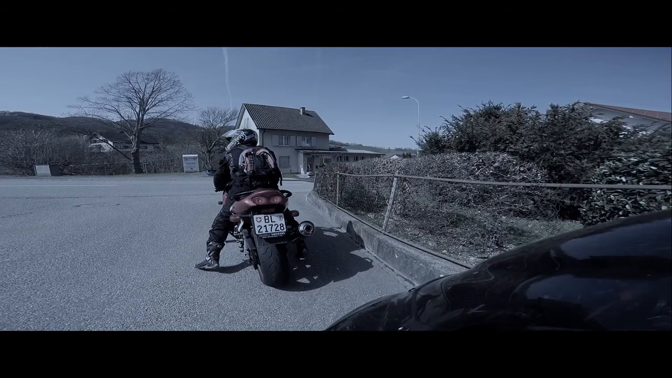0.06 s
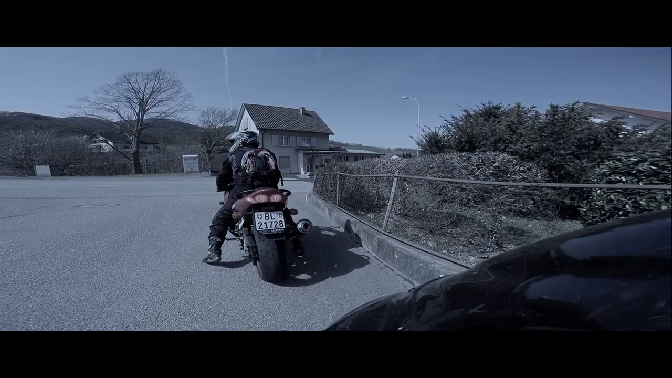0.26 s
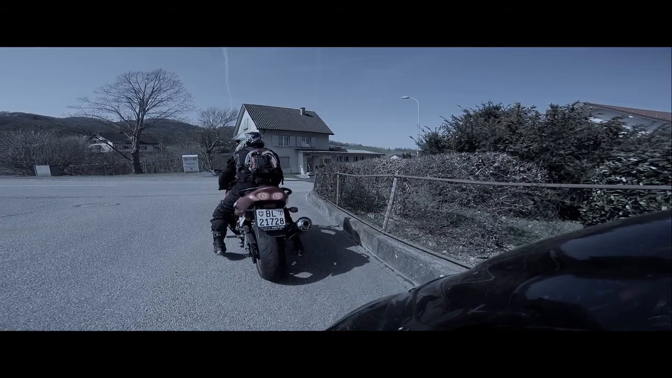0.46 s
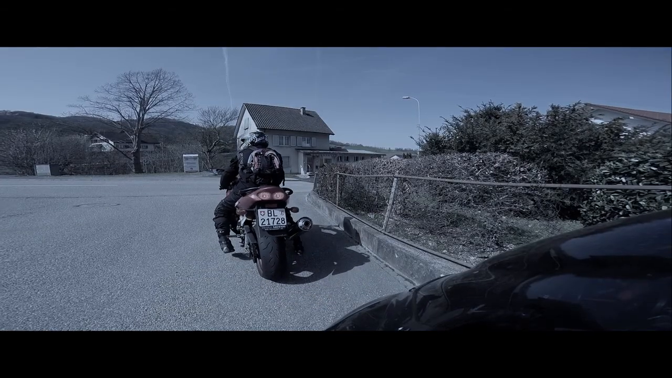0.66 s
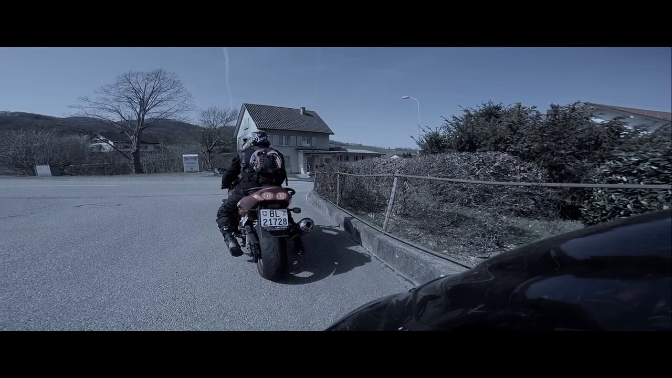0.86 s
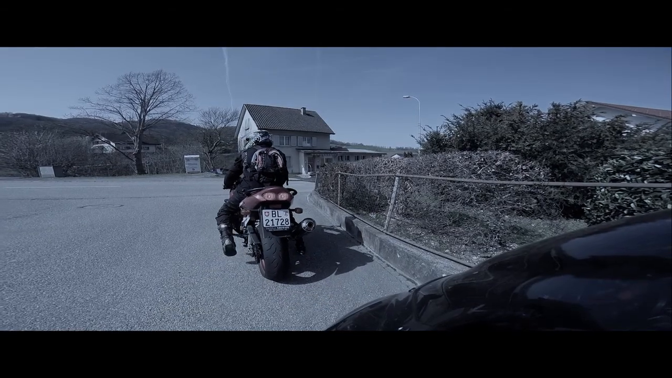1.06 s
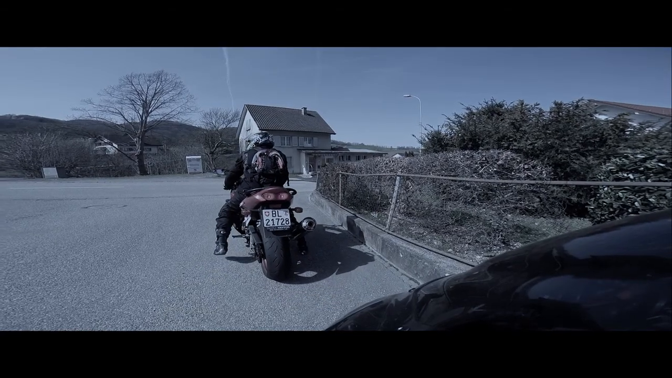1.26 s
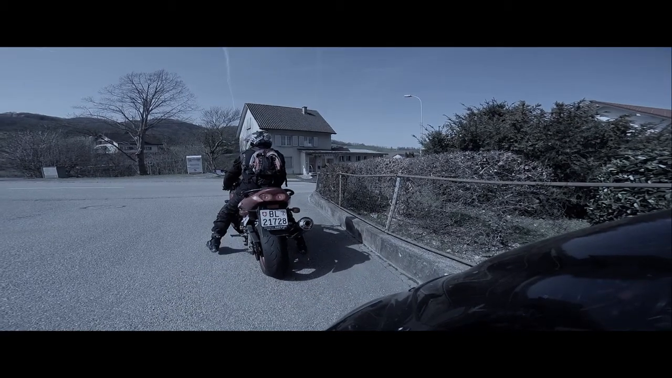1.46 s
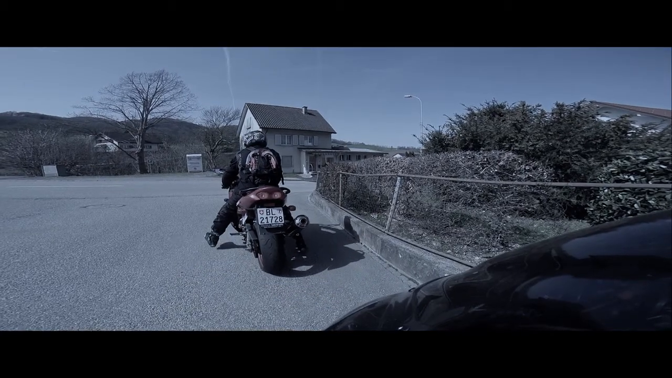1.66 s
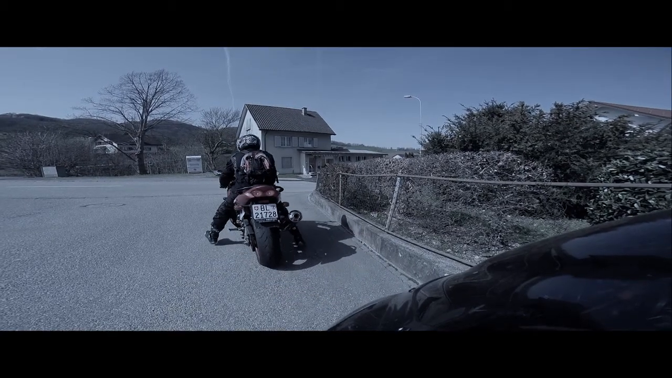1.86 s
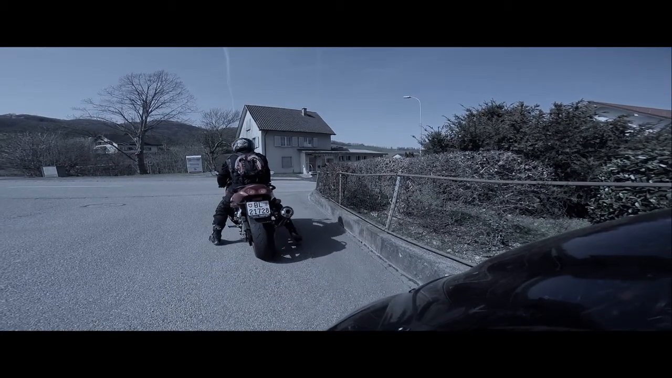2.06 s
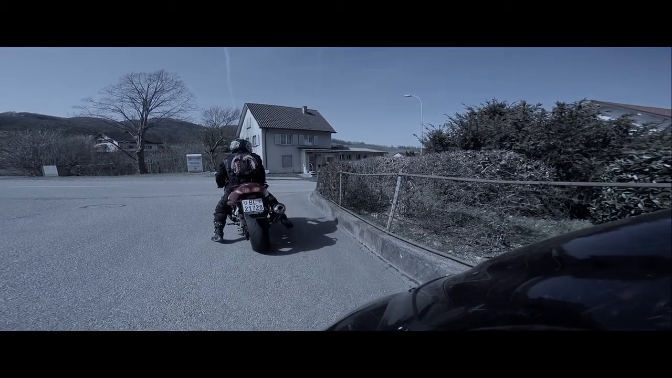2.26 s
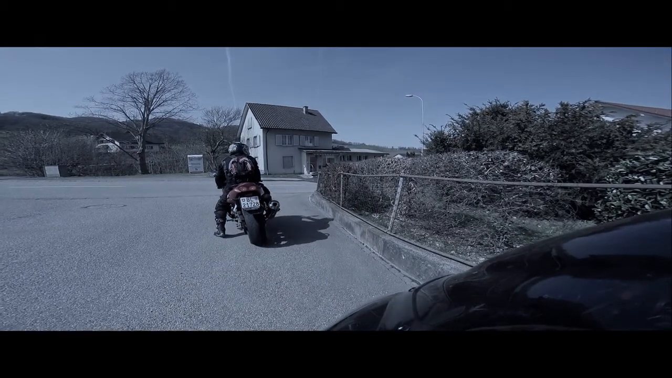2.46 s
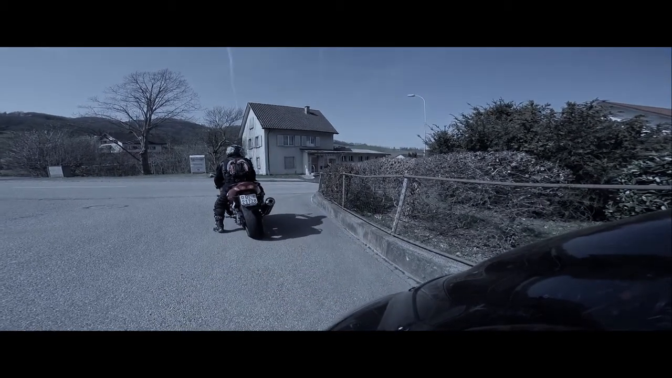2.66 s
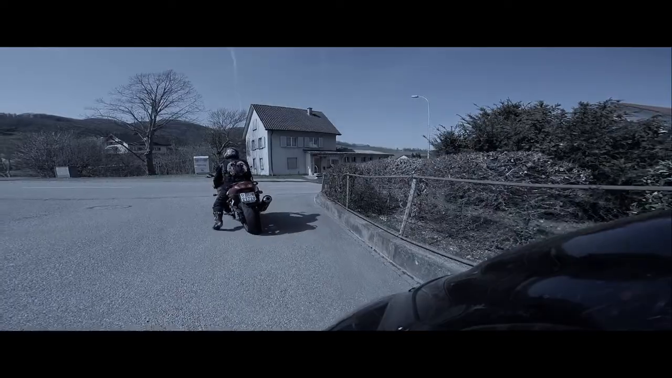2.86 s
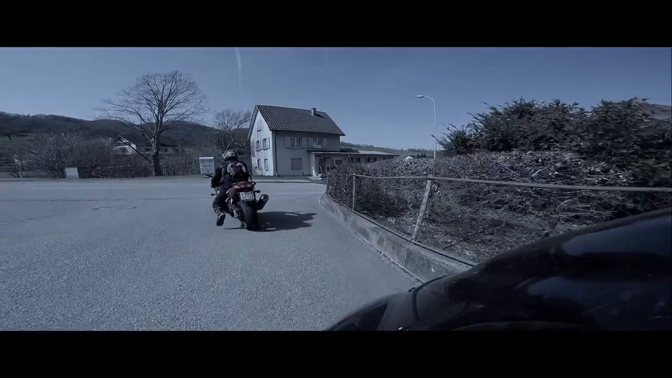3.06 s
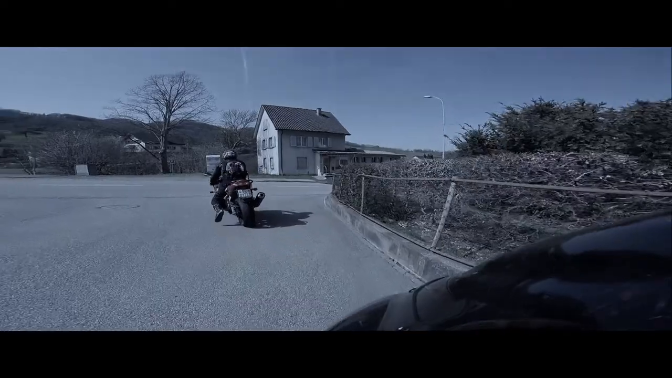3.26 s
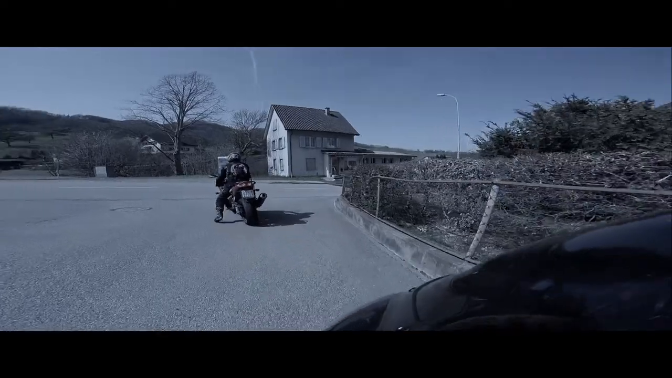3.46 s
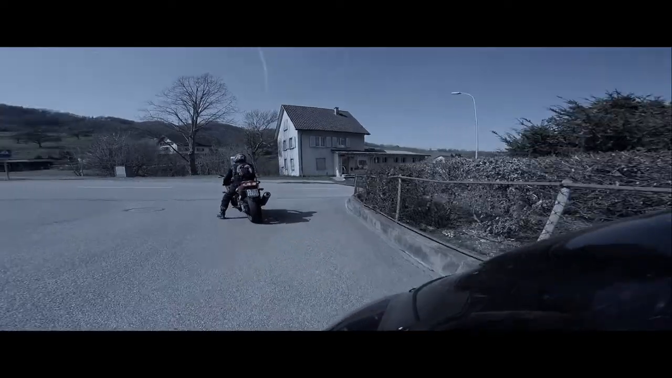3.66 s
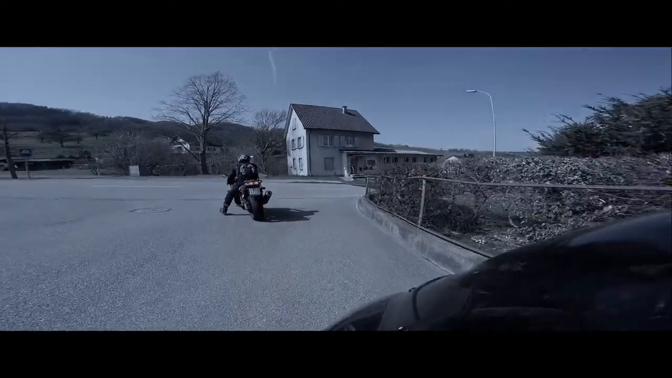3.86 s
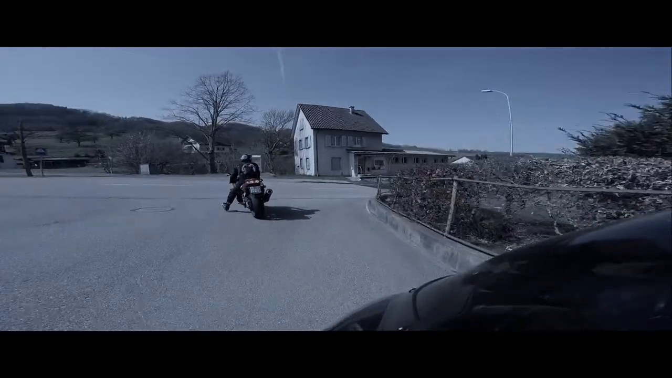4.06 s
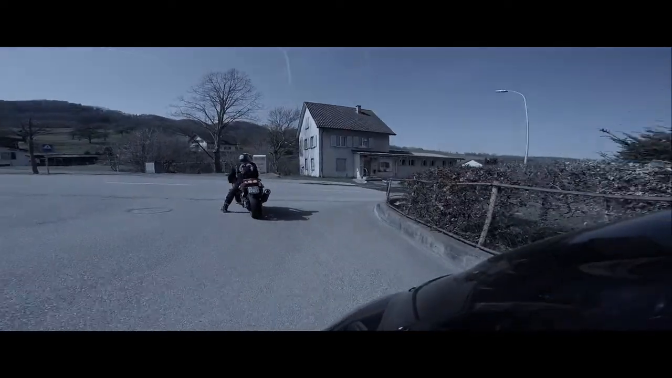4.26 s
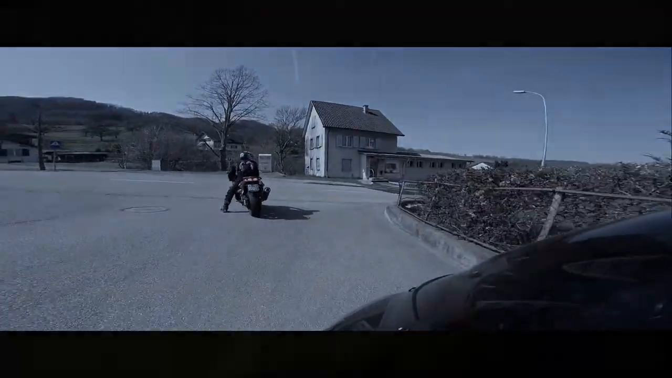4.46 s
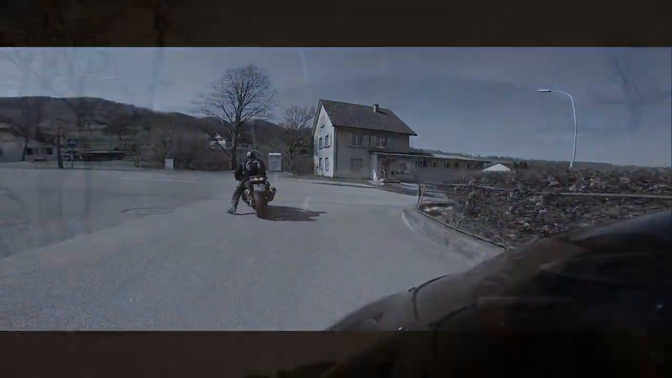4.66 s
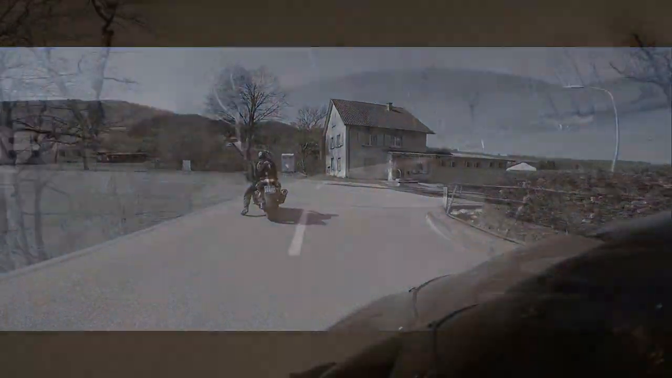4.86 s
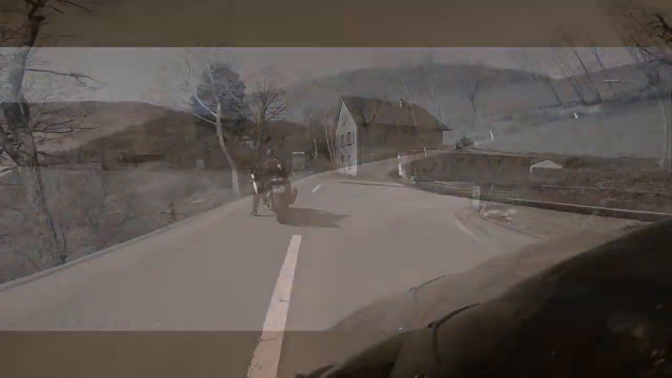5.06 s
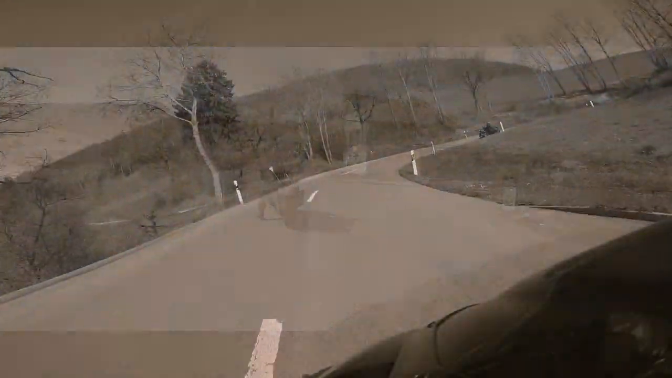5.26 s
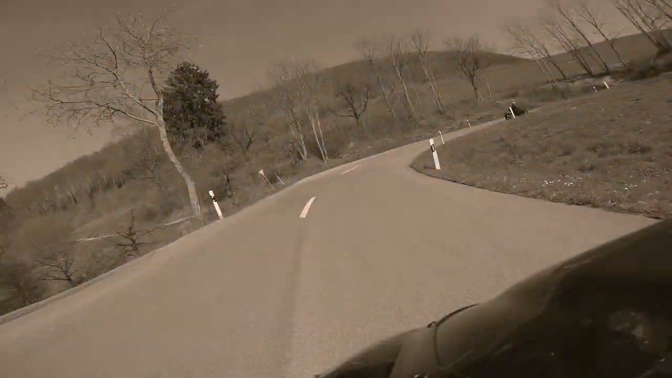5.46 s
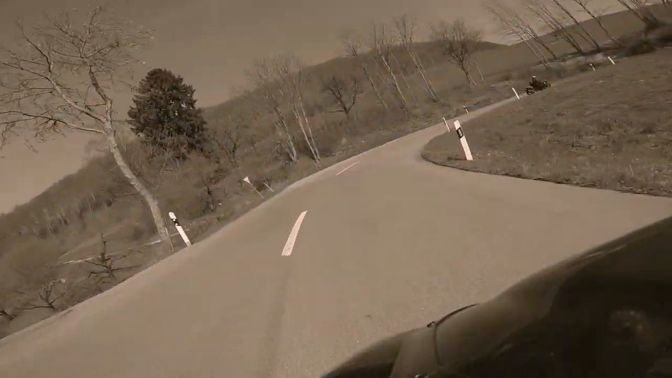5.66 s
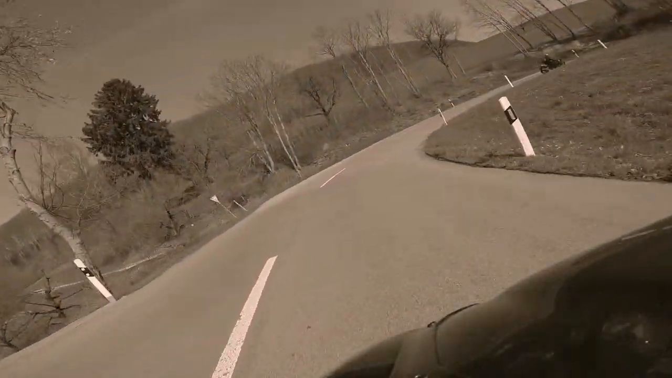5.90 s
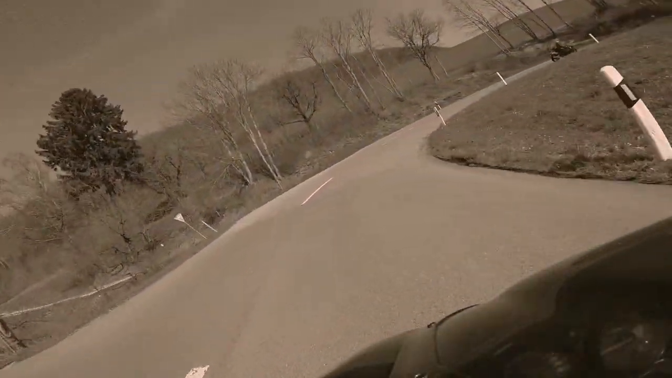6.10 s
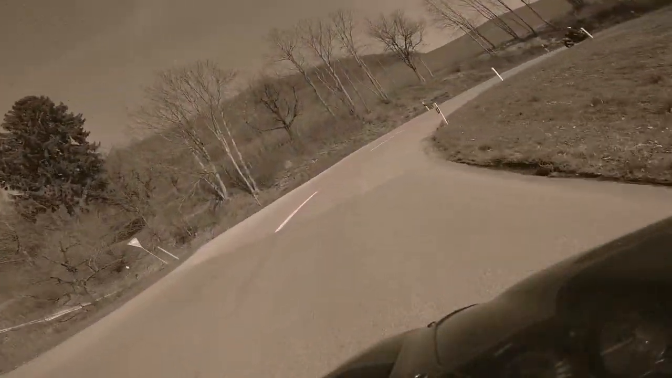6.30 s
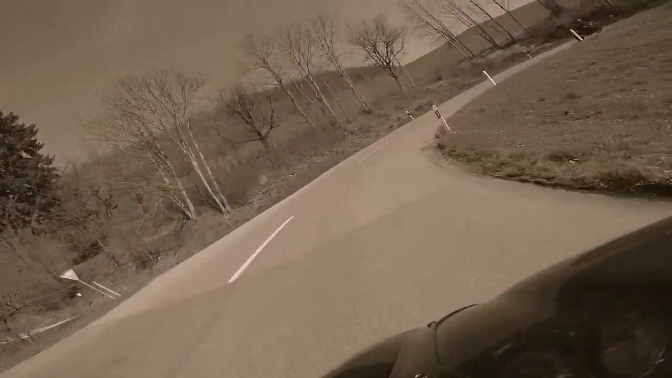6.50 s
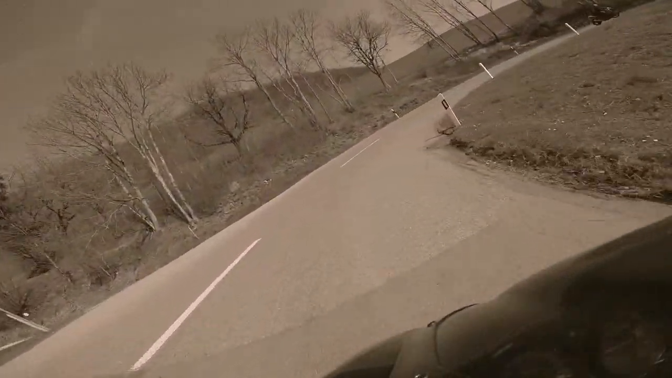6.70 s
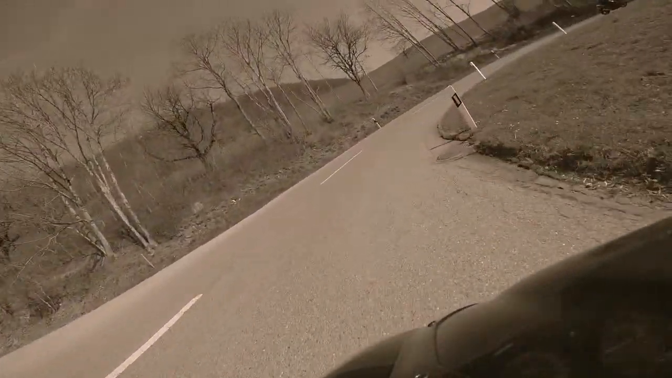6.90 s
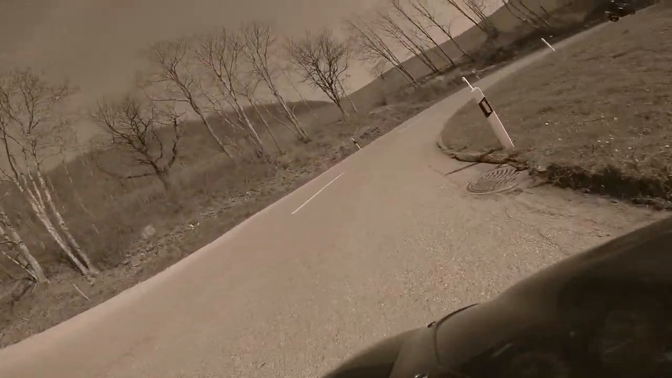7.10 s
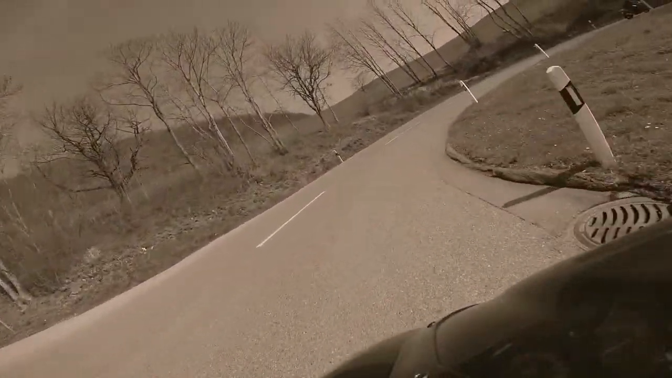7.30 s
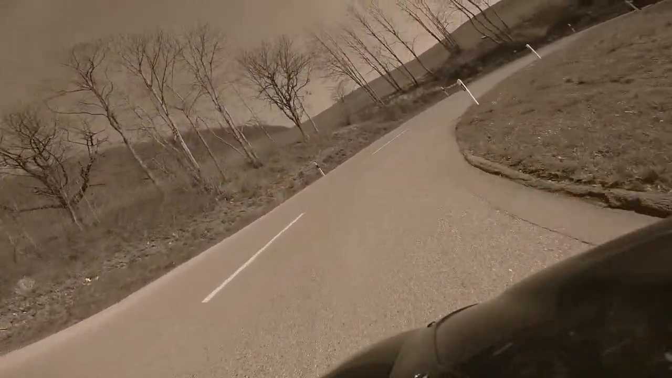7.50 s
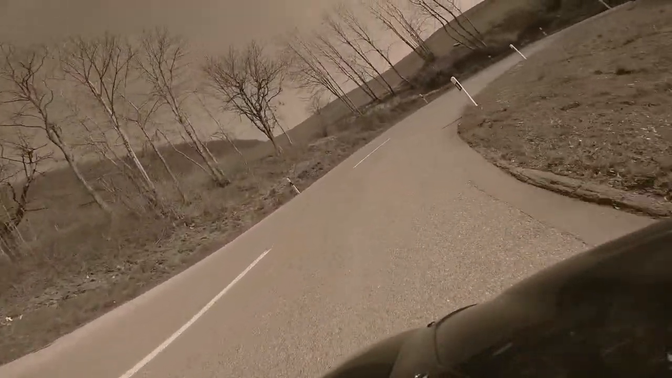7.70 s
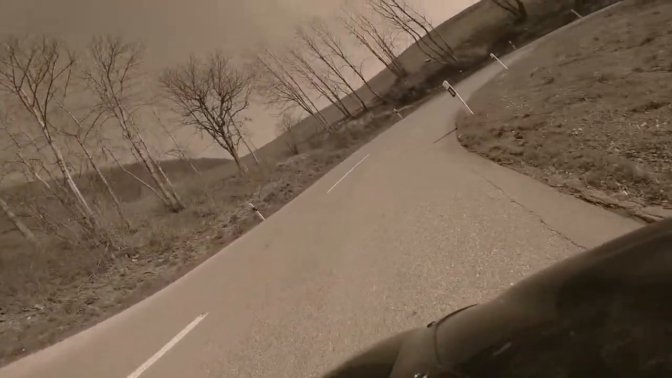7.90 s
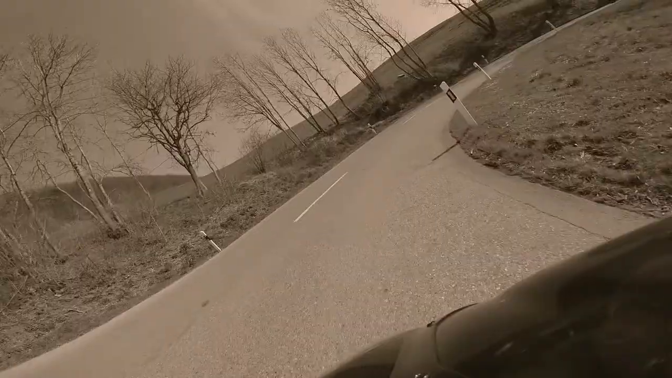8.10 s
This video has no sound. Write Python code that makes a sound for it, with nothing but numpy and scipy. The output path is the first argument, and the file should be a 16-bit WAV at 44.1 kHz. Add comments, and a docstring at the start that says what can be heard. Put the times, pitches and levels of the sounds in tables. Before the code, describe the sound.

A motorcycle's starter whines and grinds for a moment before the engine fires, surges and gradually settles into a boomy idle. Thin ticks dot the muffled valve clatter. Clutch take-up brings a dip, throbs and dull knocks. The sound crossfades to faster riding with a fleeting airy whistle, soft tyre hum and deep wind rumble; revs sink, linger, then rise. The microphone sits close, boxed in on the bike.

```python
"""A four-cylinder motorcycle, heard from inside a closed case on the bike. The starter grinds in bursts (noise
and a whine), then the engine catches, flares, settles and pulls away at idle speed. The scene dissolves into a
ride: the revs sink, hold and rise in a bend. Sine waves at the firing rate make the boom and its overtones;
pulsing noise and valve taps shake the case, which rings near 1.8 kHz. Short impulses make knocks and thin sharp
ticks. Wind rumbles throughout; on the ride, filtered noise makes the tyres sing, and air whistles briefly."""
import sys
import numpy as np
from scipy import signal
from scipy.fft import rfft, irfft, next_fast_len
from scipy.io import wavfile
from scipy.ndimage import uniform_filter1d, minimum_filter1d, map_coordinates

SR = 44100
rng = np.random.default_rng(int(sys.argv[2]) if len(sys.argv) > 2 else 0)


def wav_out(sig):
    """Save sig, one row per channel (or a flat mono array), as 16-bit PCM at SR to the path in sys.argv[1]."""
    wavfile.write(sys.argv[1], SR, np.round(np.clip(np.atleast_2d(sig).T, -1, 1) * 32767).astype(np.int16))


N = 358974
T = np.arange(N) / SR  # time of every sample, s

# how the closed case colours a shake: pitch_hz [Hz], level_db [relative dB]
CASE_COLOUR = [(330, -50), (560, -32.5), (651, -37.5), (719, -19), (807, -22), (892, -17.5), (986, -19),
               (1170, -30), (1270, -24.5), (1490, -6.5), (1760, 4), (2060, -3), (2760, -32.5), (2950, -38),
               (3100, -36.5), (4030, -59.5), (6820, -120)]
# the faint treble that gets through the case: pitch_hz [Hz], level_db [relative dB]
SIZZLE_COLOUR = [(2500, -10), (3800, 9), (5000, 3.5), (5900, -1), (6500, -0.5), (7200, -9), (10000, -14),
                 (15000, -33.5)]
# moments when the engine works harder: middle_s [s], half_length_s [s], extra_db [dB of clatter]
EFFORT_SWELLS = [(.4, 0.091, 8.5), (.55, 0.029, 4.5), (.72, 0.13, 1), (2.66, 0.071, 3), (3.2, 0.19, 5),
                 (5.75, 0.19, 2), (8.02, 0.52, 2.5)]
# the dissolve into the ride: start_s, end_s [s]
DISSOLVE_S = (4.606, 5.56)

CATCH_S, CLUTCH_S = 0.367, 3.2  # the engine fires; the bike starts to move
IDLE_HZ = 45  # firing rate from which the octaves of revs are counted
EFFORT_SHARE = 0.78  # how much of the effort reaches the overtones and the rumble


def revs():
    """Firing rates in town and on the road, and the share of the road as one scene dissolves into the other."""
    # idle, dragged down as the clutch bites: time_s [s], firing_hz [Hz]
    idle_revs = [(.36, 37.95), (.45, 45.42), (2.8, 44.86), (2.95, 37.5), (3.2, 36.42), (3.55, 41.96),
                 (3.8, 38.56), (4.05, 43.83), (4.3, 41.13), (4.43, 46.52), (4.7, 44.4)]
    # revs on the road: time_s [s], firing_hz [Hz]
    ride_revs = [(4.8, 107.3), (5.25, 99.82), (5.51, 85.07), (5.9, 61.28), (6.17, 56.96), (6.42, 59.39),
                 (6.9, 56.45), (7.53, 55.64), (7.62, 59.77), (7.82, 91.3), (8.14, 121)]
    # the flare climbs at a steady rate to its top, then sinks by equal octaves back to idle
    top_s, top_hz, rise_hz_per_s, fall_oct_per_s = .6, 193.4, 1090, 1.92
    since_top = T - top_s
    falling_hz = top_hz * 2 ** (-fall_oct_per_s * since_top)
    flare_hz = np.clip(top_hz + rise_hz_per_s * since_top, 0, falling_hz)
    # a smooth way to take the higher of the two rates
    town_hz = (flare_hz ** 8 + curve(idle_revs) ** 8) ** (1 / 8)
    wander = 1 + .008 * walk(9)  # random drift, as a share of the firing rate
    return town_hz * wander, curve(ride_revs) * wander, np.interp(T, DISSOLVE_S, [0, 1])


def engine(town_hz, road_hz, riding, octaves):
    """The firings' boom and overtones, valve clatter and airbox hum, with faint dry ticks on the boom's crests."""
    # overtones; fractions come from unequal cylinders: multiple [of the firing rate], level_db [relative dB]
    flare_overtones = [(.25, -33), (.5, -40.5), (.75, -42.5), (1.25, -49), (1.5, -47.5), (1.75, -45),
                       (2, -40), (2.5, -54.5), (3, -49), (4, -59), (5, -56)]
    idle_overtones = [(.5, -45), (1.5, -46.5), (2, -41), (2.5, -51.5), (3, -47.5), (4, -56.5)]
    ride_overtones = [(.5, -39), (.75, -28), (1.5, -44), (2, -34), (2.5, -45), (3, -35), (4, -48)]
    # the boom surges or stumbles: middle_s [s], half_length_s [s], change_db [dB]
    boom_surges = [(.36, 0.046, -7), (.452, .02, 3), (.487, .02, 1), (2.87, 0.023, -4.5),
                   (2.95, 0.022, 3.5), (3.11, 0.042, -13), (3.26, 0.035, 4), (4.95, 0.18, -2),
                   (5.06, .04, -1.5), (5.2, 0.034, -10)]
    # brighter edge of the clatter in the flare: pitch_hz [Hz], level_db [relative dB]
    rasp_colour = [(1900, -7), (2400, -0.5), (2700, -7), (3300, -14), (3700, -35)]
    # clatter: level at idle on the stand, growth with the revs, extras in gear and on the road
    clatter_idle_db, clatter_db_per_oct, clatter_gear_db, clatter_road_db = -25.5, 4, 0.75, -0.08

    # running totals of firings
    town_turns, road_turns = np.cumsum(town_hz) / SR, np.cumsum(road_hz) / SR
    # controls from 0 to 1
    running = np.interp(T, [CATCH_S - .01, CATCH_S + 0.014], [0, 1])
    revving, pulling = np.clip((np.array([town_hz, road_hz]) - 62) / 25, 0, 1)
    in_gear = np.clip((T - CLUTCH_S) / 0.12, 0, 1)

    # the boom throbs about 6.4 times a second while the clutch slips
    throb_db = 1.5 * in_gear * np.sin(2 * np.pi * 6.4 * T + 1.1 * walk(3.5))
    town_boom = firing_line(town_turns, town_hz, swells(boom_surges) + throb_db)
    # extra boom when revving in gear
    road_boom = firing_line(road_turns, road_hz, 6 * pulling + 0.86 * walk(14))
    boom = running * (1 - riding) * town_boom + riding ** 1.59 * road_boom

    town_note = revving * overtones(town_turns, flare_overtones, rough=.8)
    town_note += (1 - revving) * overtones(town_turns, idle_overtones, rough=.6)
    town_note *= undb(-3 * (1 - in_gear) * (1.5 - revving))  # softer with no load
    road_note = overtones(road_turns, ride_overtones, rough=.3)
    # the mount passes little above 200 Hz, so high overtones fade as the revs climb
    road_note = colour(road_note, [(20, 5.5), (180, -2.5), (280, -11.0), (500, -17.5)])
    effort_db = swells(EFFORT_SWELLS)
    note = running * (1 - riding) * town_note + riding ** 0.53 * road_note
    note *= undb(EFFORT_SHARE * effort_db - 0.75)

    shake = np.sqrt(1 - riding) * valves(town_turns, depth=0.3, scatter_db=1.5, tap_db=-8.0)
    shake += np.sqrt(riding) * valves(road_turns, depth=.28, scatter_db=1.5, tap_db=-9)
    rasp = undb(-18.5) * revving * unit(colour(shake, rasp_colour))
    clatter_db = clatter_idle_db + clatter_db_per_oct * octaves
    clatter_db = clatter_db + clatter_gear_db * in_gear + clatter_road_db * riding
    clatter = (case(shake) + rasp) * running * undb(clatter_db + effort_db + .5 * walk(8))

    # the airbox hums while the engine flares
    intake = undb(-46) * revving * unit(ring(rng.standard_normal(N), 545, 70))
    return boom + note + clatter + intake + crest_ticks(boom, riding)


def firing_line(turns, hz, db):
    """A nearly pure, deep tone, as loud as the mount lets it be at that rate."""
    # the mount booms most at low revs: firing_hz [Hz], boom_db [dB, before surges and other changes]
    mount_boom = [(36, -11.5), (45, -9.5), (56, -11), (62, -10), (68, -23), (80, -20), (97, -21.5),
                  (106, -26.5), (117, -19), (170, -20.5), (195, -23.5)]
    mount_db = np.interp(hz, *np.transpose(mount_boom))
    return np.sqrt(2) * np.cos(2 * np.pi * turns) * undb(mount_db + db)


def overtones(turns, orders, rough):
    """Tones at multiples of the firing rate, wavering with uneven combustion."""
    note = np.zeros(N)
    for multiple, db in orders:
        tone = np.sqrt(2) * np.cos(2 * np.pi * multiple * turns)
        note += undb(db) * tone * (1 + rough * walk(35))
    return note


def valves(turns, depth, scatter_db, tap_db):
    """Noise that swells with each firing, and two valve taps a firing, each of its own strength."""
    beat = (2 * turns).astype(int)
    chance = rng.standard_normal((4096, 2))
    strength_db = scatter_db * np.clip(chance[beat, 0], -2, 2)
    # every second tap is weaker, and so is every second firing
    strength = undb(strength_db - 2.8 * (beat % 2) - 0.38 * (beat // 2 % 2))
    swell = np.exp(depth * np.cos(2 * np.pi * turns + 0.52) + 0.067 * np.cos(4 * np.pi * turns))
    taps, at = np.zeros(N), np.flatnonzero(np.diff(beat))
    # taps land a little early or late, by 1.165 ms as a typical spread
    late = (0.001165 * SR * chance[beat[at], 1]).astype(int)
    taps[np.clip(at + late, 0, N - 1)] = strength[at + 1] * rng.choice([-1, 1], len(at))
    hiss = unit(swell * strength * rng.standard_normal(N))
    return unit(hiss + undb(tap_db) * unit(taps))


def case(shake):
    """The closed case rings broadly near 1.8 kHz and lets only a faint sizzle through above."""
    # narrow rings: pitch_hz [Hz], width_hz [Hz], level_db [dB against the broad ring]
    case_rings = [(528.6, 86, -32.5), (899.5, 140, -25.5), (1811, 46, -8.5), (2926, 140, -33.5),
                  (5770, 350, -51.5)]
    rings = sum(undb(db) * unit(ring(shake, hz, width)) for hz, width, db in case_rings)
    body = unit(unit(colour(shake, CASE_COLOUR)) + rings)
    return body + undb(-43.5) * unit(colour(shake, SIZZLE_COLOUR))


def crest_ticks(boom, riding):
    """Faint dry ticks fall on the crests of the boom; they are duller on the road."""
    rate_per_s = 650 * np.minimum(np.abs(boom) / .5, 1) ** 4
    chance, size = rng.random(N), rng.standard_normal(N)
    clicks = (chance < rate_per_s / SR) * np.sign(boom) * undb(8.35 * np.clip(size, -2, 2) - 40.5)
    bright = colour(clicks, [(2500, 4), (3800, 5.5), (7000, -6.5), (10000, -14.5), (15000, -18.0)])
    dull = colour(clicks, [(2500, -9), (3800, 5), (7000, -7.0), (10000, -18.5), (15000, -47)])
    return (1 - riding) * bright + riding * dull


def starter():
    """Gear teeth grind in bursts, one for each compression; the motor's whine sags under each load."""
    # straining against each compression: start_s [s], length_s [s], level_db [relative dB]
    crank_bursts = [(-.01, 0.028, -8.5), (0.086, 0.053, -21.5), (0.2, 0.049, -18.5), (.302, 0.04, -17)]
    # colour of the grinding: pitch_hz [Hz], level_db [relative dB]
    grind_colour = [(330, -71.5), (560, -26.5), (642, -57), (670, -30), (704, -19.5), (842, -10.5),
                    (972, -11.5), (1160, -24.5), (1280, -30.5), (1330, -18.5), (1500, -5), (1770, -1.5),
                    (2180, -6), (2760, -32.5), (3100, -26), (4030, -74), (6820, -120)]
    strain = np.zeros(N)
    load = undb(-29.5) * np.interp(T, [.36, .39], [1, 0])  # faint grinding between the bursts
    for s, length, db in crank_bursts:
        corners_s = [s - .003, s + 0.0013, s + length - .008, s + length + 0.01]
        load = load + undb(db) * np.interp(T, corners_s, [0, 1, 1, 0])
        strain += np.interp(T, [s, s + length, s + length + .02], [0, 1, 0])
    whine_hz = 1020 - 200 * np.minimum(strain, 1) + 34 * walk(259.2)
    mesh = np.cumsum(whine_hz) / SR
    whine = undb(-8) * np.sin(2 * np.pi * mesh) + undb(4) * np.sin(4 * np.pi * mesh)
    whine = np.sqrt(strain) * whine
    # noise pulsing about 175 times a second
    pulses = np.exp(0.54 * np.cos(2 * np.pi * 175 * T + walk(40.7)))
    teeth = unit(pulses * rng.standard_normal(N))
    grind = undb(-3.0) * unit(colour(teeth, grind_colour))
    grind += undb(-45) * unit(ring(teeth, 6430, 300))
    grind += undb(-45.5) * unit(colour(teeth, SIZZLE_COLOUR))
    return load * (grind + whine)


def knocks():
    """Slack in the drive knocks the case, which rings on for a few milliseconds."""
    # the hardest knocks: time_s [s], level_db [relative dB]
    hard_knocks = [(.3879, -4), (.5715, -1), (.594, -10), (1.9235, -7.5), (3.1167, -3.5), (3.2257, -7.5),
                   (3.3285, -6.5), (3.3785, -7), (3.929, -8), (5.0955, -2), (5.1749, -6.5), (5.6212, -2.5),
                   (5.698, -3.5), (6.0937, -4.5), (6.2654, -4.5), (6.4043, -5.5), (6.4941, -3),
                   (6.8613, -5.5), (6.9666, -5), (7.6774, -1.5), (7.7987, -1.5), (7.978, -3), (8.0154, 4)]
    # light ones, about 2.5 a second once the drive is engaged
    light_knocks = scattered(2.5 * (T > CLUTCH_S), -9.5, spread_db=1.5)
    blows = coloured_impulses(list(hard_knocks) + light_knocks, CASE_COLOUR)
    return undb(-4.5) * blows + ring(blows, 1810, 150)


def ticks(octaves):
    """Thin sharp ticks, heard before the ride; the faint random ones come thickest while the engine flares."""
    # ticks at set times, loud and faint: time_s [s], peak_db [dB]
    timed_ticks = [(.2374, -37), (.2713, -39), (.3386, -35), (.4384, -28.5), (.5387, -23), (.5721, -35),
                   (.6719, -35), (.7053, -33), (1.039, -34), (1.2055, -36), (2.809, -28.5), (4.2522, -36)]
    before_ride = (T > CATCH_S) * (T < DISSOLVE_S[0])
    # about 2.3 a second at idle, twice as many for each octave of revs
    faint_ticks = scattered(2.3 * 2 ** octaves * before_ride, -34.5, spread_db=1)
    return coloured_impulses(list(timed_ticks) + faint_ticks, [(2500, 5.0), (6000, -4.5), (15000, -14.5)])


def tyres(riding, octaves):
    """Tyres sing on the asphalt near 850 Hz once the bike is at speed."""
    roll = rng.standard_normal(N)
    song = unit(ring(roll, 900, 120) + 0.63 * ring(roll, 745, 83))
    return song * riding * undb(-42.5 + 1.2 * octaves + 1.7 * walk(9))


def whistle():
    """A thin, airy whistle in puffs past an edge; its pitch and level flutter with the turbulence."""
    # puffs of air: middle_s [s], half_length_s [s], level_db [dB, before the flutter]
    air_puffs = [(4.88, .01, -57), (4.933, 0.012, -53), (5.057, .04, -54), (5.13, 0.013, -53),
                 (5.33, 0.15, -49), (5.747, 0.032, -54.5)]
    tone = unit(np.sin(2 * np.pi * np.cumsum(5800 + 200 * walk(420)) / SR))
    air = unit(ring(rng.standard_normal(N), 5780, 600))
    blowing = swells([(s, half, undb(db)) for s, half, db in air_puffs])
    flutter = unit(undb(4 * np.minimum(walk(60), 1)))
    return unit(tone + undb(6.0) * air) * blowing * flutter


def rumble(riding, octaves):
    """Wind and frame shake: deep noise, growing with the revs and buffeting a little."""
    # colour of the deep noise: pitch_hz [Hz], level_db [relative dB]
    frame_colour = [(20, -20.5), (40, 6.5), (52, 8), (80, -8.5), (130, -6.5), (200, -15.5), (290, -18.5),
                    (380, -26), (540, -30), (650, -45.5), (1500, -59.5)]
    # level at idle, growth with the revs, and the extra on the road
    idle_db, db_per_oct, road_db = -31, 2, 3
    shake = colour(rng.standard_normal(N), frame_colour)[::-1]  # reversed, so it is already under way at the start
    db = idle_db + db_per_oct * octaves + road_db * np.sqrt(riding) + EFFORT_SHARE * swells(EFFORT_SWELLS)
    return unit(shake) * undb(db + 2.0 * walk(12))


def undb(db):
    """Decibels to gain."""
    return 10 ** (np.asarray(db) / 20)


def unit(x):
    """Scale to an average (rms) level of 1."""
    return x / np.sqrt(np.mean(x ** 2))


def curve(rows):
    """(s, value) rows joined by straight lines in time."""
    return np.interp(T, *np.transpose(rows))


def walk(rate):
    """Slow random drift with a spread of 1, taking a new turn `rate` times a second."""
    knots = rng.standard_normal(4096)
    return unit(map_coordinates(knots, [T * rate], order=1, mode="wrap"))


def swells(rows):
    """A bell-shaped swell for each (s, half-length s, height) row."""
    return sum(height * np.exp(-((T - s) / half) ** 2) for s, half, height in rows)


def colour(x, points):
    """Filter with the given (Hz, dB) response, falling away beyond its ends; it never sounds ahead of its input."""
    hz, db = np.transpose(points)
    size = next_fast_len(N + SR // 2, real=True) // 2 * 2
    octave = np.log2(np.maximum(np.fft.rfftfreq(8192, 1 / SR), 1))
    outside = np.abs(octave - np.clip(octave, np.log2(hz[0]), np.log2(hz[-1])))
    # 30 dB down per octave outside, at most 50 dB
    gain = undb(np.interp(octave, np.log2(hz), db) - np.minimum(30 * outside, 50))
    # folding the cepstrum gives the response with the least delay (minimum phase)
    cepstrum = irfft(np.log(gain))
    cepstrum[1:len(gain) - 1] *= 2
    cepstrum[len(gain):] = 0
    impulse = irfft(np.exp(rfft(cepstrum)))
    return irfft(rfft(x, size) * rfft(impulse, size))[:N]


def ring(x, hz, width_hz):
    """One resonance, applied twice for steep skirts."""
    b, a = signal.iirpeak(hz, hz / width_hz, SR)
    return signal.lfilter(b, a, signal.lfilter(b, a, x))


def impulses(rows):
    """One impulse for each (s, dB) row."""
    out = np.zeros(N)
    for s, db in rows:
        out[int(np.clip(s * SR, 0, N - 1))] += undb(db)
    return out


def coloured_impulses(rows, points):
    """Impulses through a response, each peaking at its own level."""
    one_impulse = colour(impulses([(0, 0.0067)]), points)
    return colour(impulses(rows), points) / np.abs(one_impulse).max()


def scattered(per_s, db, spread_db):
    """Random (s, dB) rows at a rate that may change with time."""
    chance = rng.random((200, 2))
    due = np.cumsum(per_s) / SR  # how many rows are expected so far
    counts = np.cumsum(.2 + 1.6 * chance[:, 0])  # uneven gaps, 1 on average
    rows = []
    for count, u in zip(counts, chance[:, 1]):
        if count < due[-1]:
            rows.append((np.interp(count, due, T), db + spread_db * (2 * u - 1)))
    return rows


def scene():
    """All sources at the one microphone; the revs, in octaves above idle, drive many of their levels."""
    town_hz, road_hz, riding = revs()
    octaves = np.log2(((1 - riding) * town_hz + riding * road_hz) / IDLE_HZ)
    bike = engine(town_hz, road_hz, riding, octaves) + starter() + knocks() + ticks(octaves)
    return (bike + tyres(riding, octaves) + whistle() + rumble(riding, octaves))[None]


def record(dry):
    """A quick limiter holds down the highest crests; everything above 15.8 kHz is cut."""
    ceiling, size = .85, 128  # level, samples
    need = np.minimum(1, ceiling / np.maximum(np.abs(dry), 1e-9))
    held = minimum_filter1d(need, 2 * size)
    gain = uniform_filter1d(uniform_filter1d(held, size), size)
    top_cut = signal.ellip(8, .2, 70, 15800, fs=SR, output="sos")
    return signal.sosfilt(top_cut, dry * gain)


dry = scene()
out = record(dry)
wav_out(out)
```